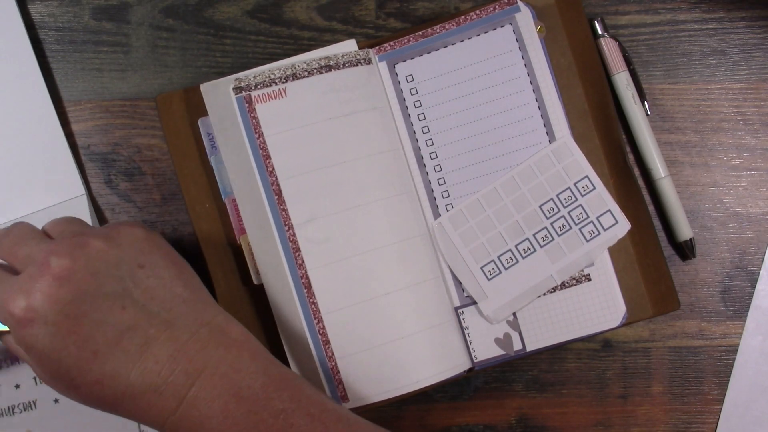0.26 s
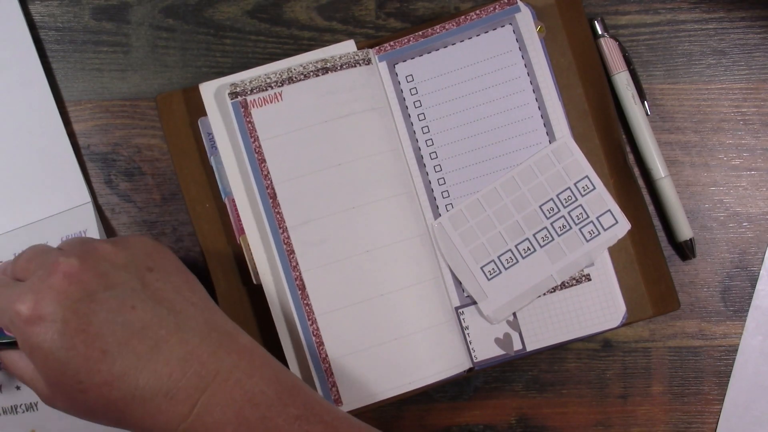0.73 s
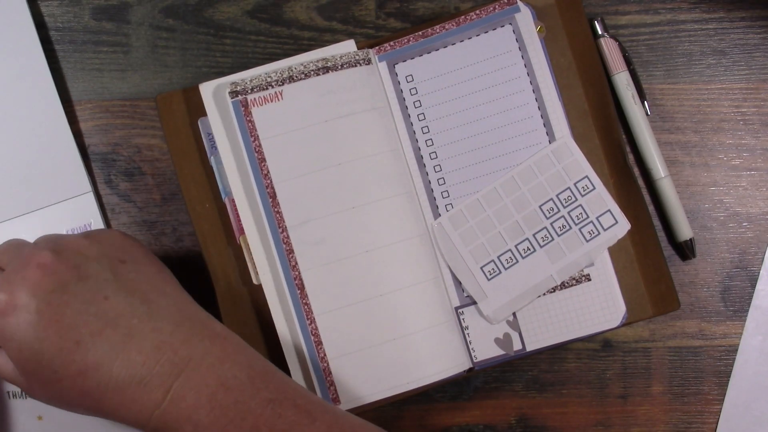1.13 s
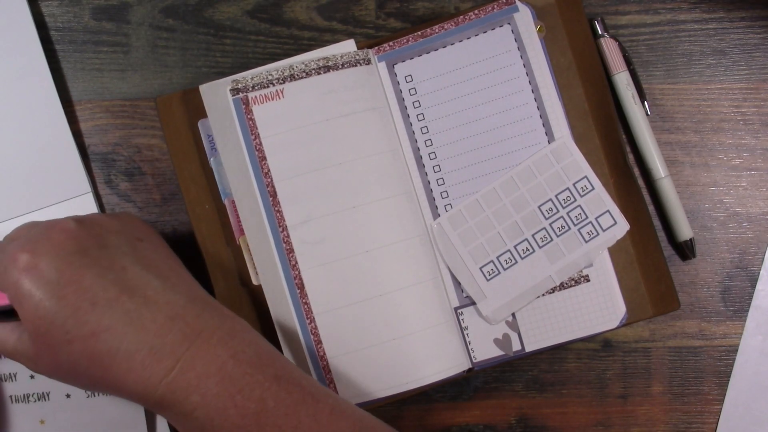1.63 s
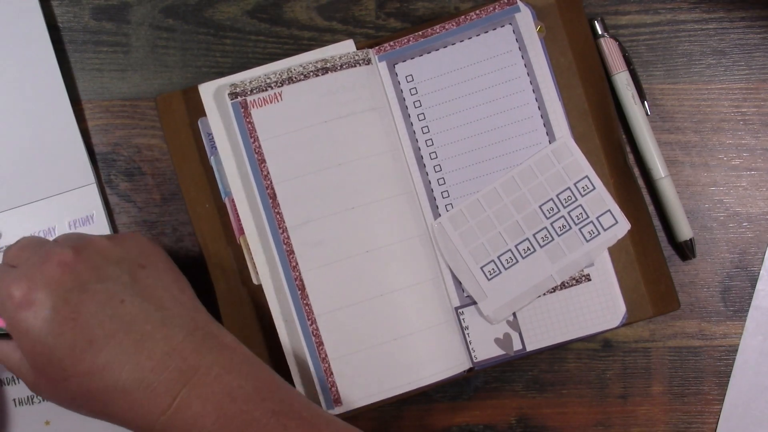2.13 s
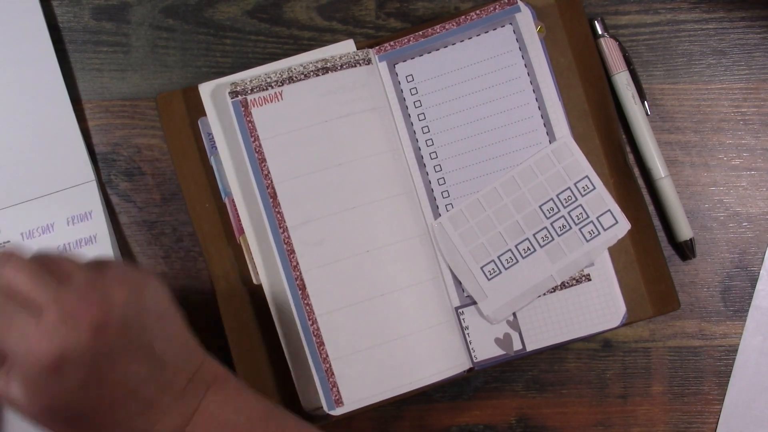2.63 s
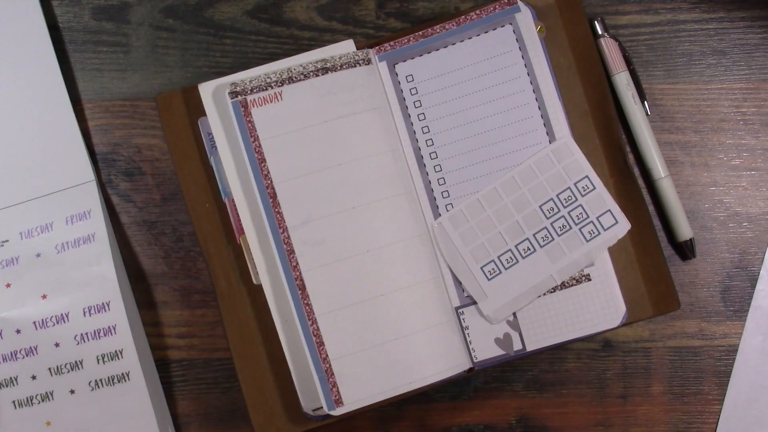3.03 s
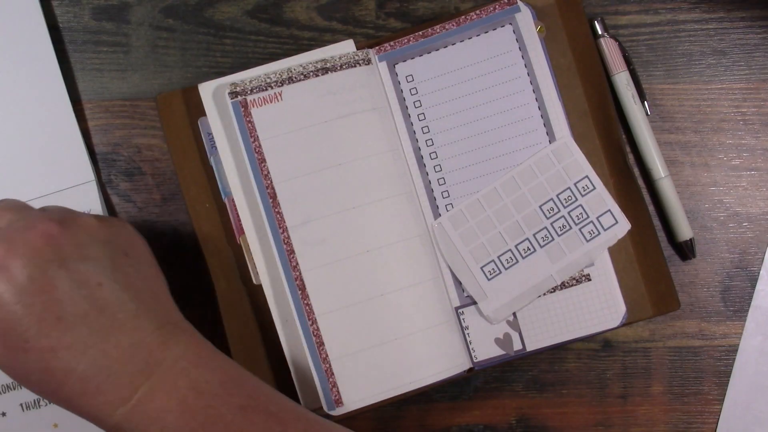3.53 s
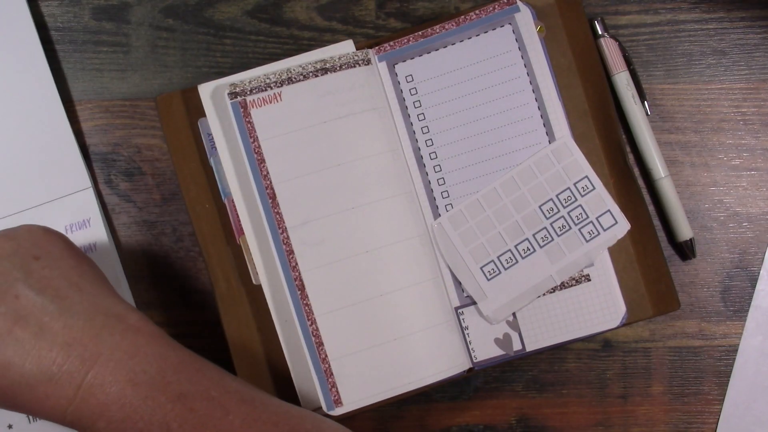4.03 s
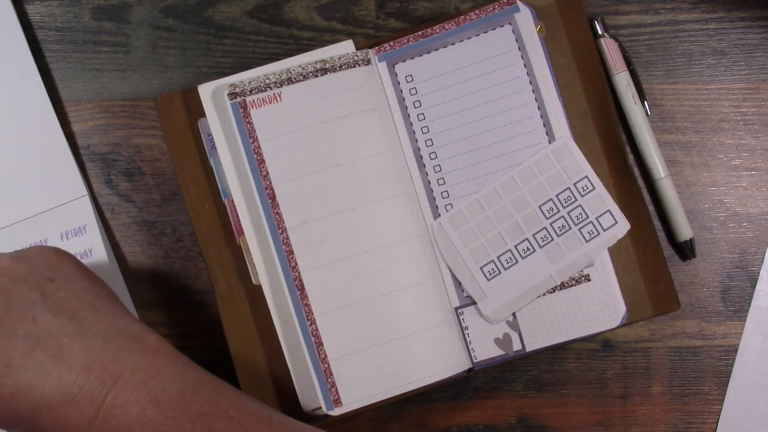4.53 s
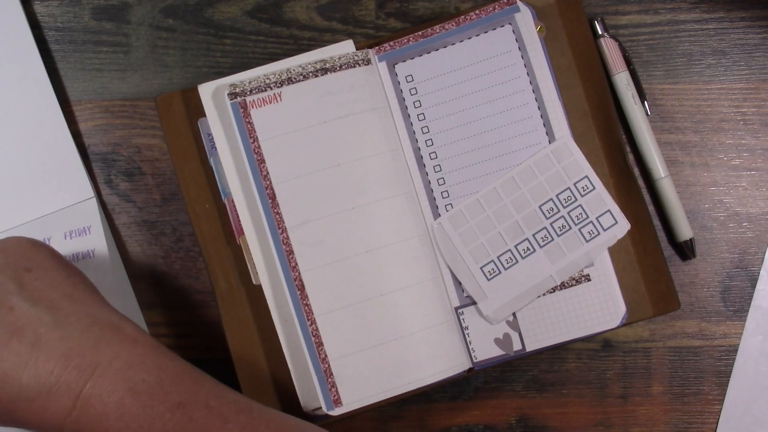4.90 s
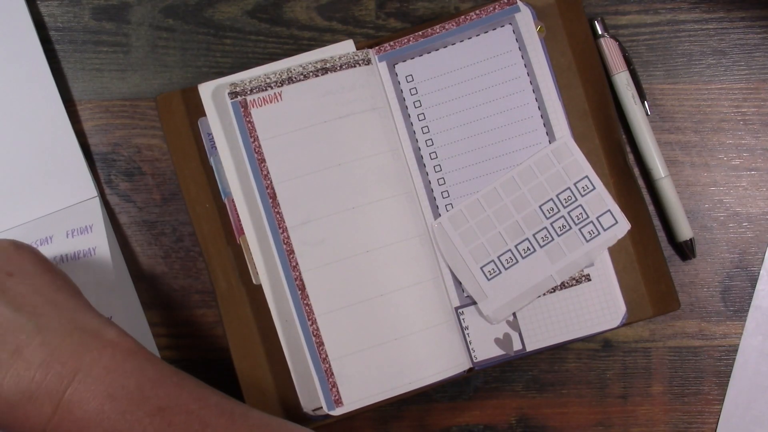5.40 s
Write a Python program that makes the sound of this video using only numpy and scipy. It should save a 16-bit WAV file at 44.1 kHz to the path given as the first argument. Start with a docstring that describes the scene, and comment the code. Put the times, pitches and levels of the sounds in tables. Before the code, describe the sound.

Stiff paper sticker sheets snap and pop loudly as they are peeled, then soft gritty rustling and faint taps in a quiet room.

```python
"""In a small quiet room, a hand peels paper sticker sheets beside a notebook on a wooden desk.
The stiff sheets snap as they buckle and the glue lets go: damped swings plus short noise bursts.
A brief flutter follows each snap; fingers and paper slide in strokes of gritty friction noise, and edges rasp.
The impulse response of desk and walls colours the paper; steady ventilation noise lies underneath."""
import sys
import numpy as np
from scipy import signal
from scipy.fft import rfft, irfft
from scipy.io import wavfile
from scipy.ndimage import uniform_filter1d

SR = 44100
rng = np.random.default_rng(int(sys.argv[2]) if len(sys.argv) > 2 else 0)


def to_wav(sig):
    """Store sig (one row per channel, or 1-D mono) as 16-bit WAV at the path in sys.argv[1].

    Samples outside -1..1 are clipped; the rate is SR.
    """
    pcm = np.clip(np.atleast_2d(sig), -1, 1) * 32767
    pcm = np.round(pcm).astype(np.int16)
    wavfile.write(sys.argv[1], SR, pcm.T)  # frames by channels


N = 249606

# Steady ventilation noise. Each row: frequency in Hz, relative level in dB per Hz.
AIR_SPECTRUM = [(12, -43), (20, -8), (65, -14.5), (268, 2), (443, 0.5), (843, -3.5), (1080, -10),
                (1350, -6.5), (1600, -6), (2240, -14.5), (2650, -13), (5620, -22.5), (6840, -23),
                (11300, -29), (15800, -38)]
AIR_DB = -53.5
# Likeness of the air noise at the two ports. Each row: frequency in Hz, correlation from 0 to 1.
AIR_LIKENESS = [(60, 0.99), (180, 0.77), (550, 0.88), (1650, 0.53), (4970, 0.76), (15000, 0.98)]

# Sliding paper or fingers. Each row: start in seconds, length in seconds, body of the rustle in dB,
# hiss in dB, hiss brightness in dB per octave.
STROKES = [(0.058, 0.15, -50.5, -59.5, -6.5), (0.14, .24, -56.5, -53, -5), (0.335, 0.17, -63, -61.5, -4),
           (0.481, 0.11, -60.5, -55.5, -3.5), (0.558, 0.11, -64, -58, -4), (0.796, 0.24, -56, -54.5, -8.5),
           (0.96, .1, -53, -62, -28), (1.276, 0.33, -53.5, -69, -9), (1.88, 0.23, -70, -64, -4.5),
           (2.073, 0.22, -63.5, -69, -2), (2.325, 0.2, -61, -59, -11), (2.578, 0.25, -90, -66.5, -2.5),
           (2.965, 0.21, -94, -66.5, -4), (3.191, 0.48, -61.5, -57, -4), (3.687, 0.31, -63.5, -61, -8),
           (3.911, 0.18, -61.5, -54.5, -8.5), (4.121, 0.14, -67, -60, -11),
           (4.256, 0.27, -64.5, -62.5, -7.5), (4.485, 0.55, -73, -74, -2), (4.979, 0.18, -61, -70.5, -17),
           (5.121, 0.16, -57.5, -62.5, -21), (5.291, 0.14, -60, -59.5, -20), (5.487, 0.11, -57.5, -61, -10),
           (5.578, 0.068, -46, -59.5, -3)]
STROKE_RISE, STROKE_FALL = 0.29, 0.47  # shares of the length
# Body spectrum of the rustle. Each row: frequency in Hz, relative level in dB per Hz.
RUSTLE_BODY = [(250, -37), (600, 7), (1200, 9), (1900, 7.5), (2600, -14), (4000, -39.5)]
STUTTER_DB, STUTTER_FRAMES = 1.5, 16  # the grip catches and lets go; one frame is 64 samples
FIBRE_RATE_HZ = 6000  # mean rate of fibre clicks

# Snaps of the sheet. Each row: start in seconds, flap of the sheet in dB, thud on the desk in dB,
# pop of the fold in dB, crack of the glue in dB, crack brightness in dB per octave.
SNAPS = [(0.236, -57, -55, -33.5, -47, -11), (0.562, -27, -23.5, -48, -43, -13),
         (0.57, -28.5, -44, -26.5, -57, -6), (0.593, -14, -19.5, -35, -64, -13),
         (0.747, -16, -18.5, -9.5, -46, -22), (0.823, -34, -29.5, -49, -50, -3),
         (0.957, -10, -10, -11, -34, -11), (1.087, -51, -52, -47, -54, -12),
         (1.121, -13.5, -28, 0.8, -25.5, -17.5), (1.291, -51, -56, -45, -60, -14),
         (1.307, -37, -58, -34, -70, -3), (1.383, -45, -58, -31, -46.5, -13),
         (1.494, -51, -57, -28.5, -48.5, -12.5), (1.759, -24.5, -29, -18, -26.5, -6),
         (2.09, -50, -62, -33, -56, -4), (2.125, -46, -56, -32.5, -66, -1),
         (2.247, -53, -53, -37, -51.5, -1), (2.334, -59, -63, -31, -44, -3.5),
         (2.356, -51, -54, -19.5, -36.5, -5.5), (2.373, -29, -66, -19, -37.5, -4),
         (2.388, -38, -57, -44, -47, -5), (2.404, -37, -60, -25, -31, -3),
         (2.425, -56, -52, -36, -37.5, -6), (2.436, -50, -60, -48, -38, 0.5),
         (2.479, -43, -47, -26, -38.5, -1), (2.484, -28, -45, -33, -37, -10),
         (2.659, -48, -58, -34, -55, -14), (3.036, -62, -62, -66, -43, 5),
         (3.315, -31.5, -34, -54, -48, 11), (3.505, -43, -32.5, -44, -53, -14),
         (3.546, -49, -44, -31, -50, -14), (4.304, -52, -35.5, -37, -41, -14),
         (4.325, -54, -33, -42, -45, -12.5), (4.991, -46, -55, -40, -60, -12),
         (5.333, -33, -36.5, -51, -51, -8), (5.513, -62, -58, -39, -46, 5),
         (5.531, -35.5, -50, -31, -46, -7), (5.551, -56, -48, -37, -45, -2),
         (5.597, -19.5, -53, -15, -29.5, -4)]
# Swings of flap, thud and pop, in that order. Each row: nominal frequency in Hz, width in cycles,
# start after the onset in seconds.
SWINGS = [(740, .75, 0), (350, .8, 0), (1550, .95, .0005)]
CRACK_S = 0.003  # the crack's envelope has halved by here
# Flutter after a snap: its body follows flap and pop, its hiss follows the crack.
FLUTTER_BODY_DB, FLUTTER_HISS_DB = -33, -19.5
FLUTTER_RISE_S, FLUTTER_T60_S = 0.0061, 0.28

# Rasps of a paper edge. Each row: start in seconds, length in seconds, centre in Hz, level before the fade in dB.
EDGE_RASPS = [(2.128, 0.078, 1900, -49), (2.466, .045, 2000, -41.5), (2.477, .022, 3460, -37.5)]

# Colour of the paper sounds at the microphone. Each row: frequency in Hz, gain in dB.
NEAR_COLOUR = [(40, -36), (120, -22.5), (330, -2), (2000, -4.5), (2600, -3.5), (9000, -1), (13000, -5.5),
               (15800, -16)]
# Ringing modes of desk and notebook. Each row: frequency in Hz, relative level in dB, T60 in seconds.
DESK_MODES = [(290, -6, .2), (395, 0, .2), (560, -6, .15), (684, 0, .16), (792, 0, .16), (885, -5, .16),
              (1005, -2, .14), (1178, -3, .15), (1252, -1, .15), (1315, -3, .15), (1383, -3, .15),
              (1435, -4, .16), (1650, 2, .16), (1895, 0, .17), (1992, -7, .15), (2160, -9, .12),
              (2430, -9, .1)]
DESK_DB = -4
# Reflections from near surfaces. Each row: delay in seconds, level before dulling in dB.
NEAR_ECHOES = [(.0012, -8), (.0016, -5), (.0042, -11), (.0084, -15)]
ECHO_DULL_HZ = 3260
# Diffuse tail of the walls. Each row: frequency in Hz, T60 in seconds, level in dB.
WALL_TAIL = [(250, .26, -11), (700, .2, -10), (1800, .19, -8), (3000, .15, -7), (6000, .13, -8),
             (12000, .1, -11)]
# Balance of the two ports. Each row: frequency in Hz, left minus right in dB.
PORT_BALANCE = [(60, -2.5), (240, 3.5), (950, 0.5), (3770, 0.5), (15000, -0.5)]
BAND_EDGE_HZ = 15900


def gain_of(db):
    """Amplitude ratio: 20 dB is a factor of ten."""
    return 10 ** (np.asarray(db) / 20)


def evened(x):
    """Normalisation to unit root-mean-square."""
    return x / np.sqrt(np.mean(x ** 2) + 1e-20)


def read(points, hz):
    """Interpolation of a curve along logarithmic frequency."""
    f, value = np.transpose(points)
    return np.interp(np.log(hz + 1), np.log(f + 1), value)


def add(mix, s, sound):
    """Superposition: a sound is summed into the mix from s seconds on."""
    part = mix[round(s * SR):][:len(sound)]
    part += sound[:len(part)]


def tilt(hz, slope_db):
    """Treble spectrum: rolled off below about 2 kHz, sloping by so many dB an octave above 2.6 kHz."""
    slope = gain_of(slope_db * np.log2(np.maximum(hz, 2600) / 6000))
    return slope / (1 + (2200 / (hz + 1)) ** 4)


def air():
    """Stationary random noise: partly correlated at the two ports, with faint drifting patches."""
    frames, hz = N // 256 + 5, np.fft.rfftfreq(1024, 1 / SR)
    a, b, c, d, patches = rng.standard_normal((frames, 513, 5)).T
    patches = uniform_filter1d(patches, 8, 0)  # along frequency
    patches = evened(uniform_filter1d(patches, 14, 1))  # along time
    same = np.clip(read(AIR_LIKENESS, hz), -1, 1)[:, None]
    left, other = a + 1j * b, c + 1j * d
    z = np.array([left, same * left + np.sqrt(1 - same ** 2) * other])
    z *= gain_of(read(AIR_SPECTRUM, hz)[:, None] + 1.4 * patches)
    noise = signal.istft(z, nperseg=1024, noverlap=768)[1][:, :N]
    return gain_of(AIR_DB) * evened(noise)


def rustles(t):
    """Friction rises and falls with each stroke; flutter after a snap decays exponentially.

    Yields envelope, body gain, hiss gain and hiss brightness in dB per octave."""
    for s, length, body_db, hiss_db, slope_db in STROKES:
        u = (t - s) / length
        ramp = np.clip(np.minimum(u / STROKE_RISE, (1 - u) / STROKE_FALL), 0, 1)
        arch = np.sin(np.pi / 2 * ramp) ** 2
        yield arch, gain_of(body_db), gain_of(hiss_db), slope_db
    for s, flap_db, _, pop_db, crack_db, slope_db in SNAPS:
        rise = np.clip((t - s) / FLUTTER_RISE_S, 0, 1)
        dying = rise * gain_of(-60 * np.maximum(t - s, 0) / FLUTTER_T60_S)
        body = np.hypot(*gain_of([flap_db, pop_db])) * gain_of(FLUTTER_BODY_DB)
        yield dying, body, gain_of(crack_db + FLUTTER_HISS_DB), slope_db


def slide():
    """Friction as random excitation: patchy noise made gritty by tiny fibre clicks of uneven size."""
    sizes = gain_of(3.2 * np.minimum(rng.exponential(1, N), 5))
    fibres = sizes * (rng.random(N) < FIBRE_RATE_HZ / SR) * rng.choice([-1., 1.], N)
    grit = evened(fibres) + 1.14 * rng.standard_normal(N)
    hz, t, z = signal.stft(grit, SR, nperseg=256, noverlap=192)
    patches = uniform_filter1d(rng.standard_normal(z.shape), 6, 0)  # along frequency
    patches = evened(uniform_filter1d(patches, 30, 1))  # along time
    body = evened(gain_of(read(RUSTLE_BODY, hz)))
    power = 0
    for envelope, low, high, slope_db in rustles(t):
        spectrum = low * body + high * evened(tilt(hz, slope_db))
        power = power + np.outer(spectrum ** 2, envelope ** 2)  # independent noises add in power
    stutter = evened(uniform_filter1d(rng.standard_normal(len(t)), STUTTER_FRAMES))
    shape = np.sqrt(power) * gain_of(1.5 * patches + STUTTER_DB * stutter)
    return signal.istft(z * shape, SR, nperseg=256, noverlap=192)[1][:N]


def swing(hz, cycles):
    """Heavily damped oscillation: the sheet pulls back, pushes and recoils."""
    u = np.linspace(-1.3, 1.3, round(2.6 * cycles * SR / hz)) * cycles  # time in periods
    swell = 1 / np.cosh(u / (0.43 * cycles)) - 1 / np.cosh(u[0] / (0.18 * cycles))
    return np.cos(2 * np.pi * u + 0.2) * swell


def snaps():
    """Buckling releases damped swings (flap, thud, sharper pop); tearing glue adds a short noise burst."""
    out, t, hz = np.zeros(N), np.arange(1024) / SR, np.fft.rfftfreq(1024, 1 / SR)
    grit = rng.standard_normal((len(SNAPS), 1024))
    detune = rng.uniform(0.79, 1.128, (len(SNAPS), 3))
    crack_envelope = np.minimum(t / 0.00011, 1) / (1 + (t / CRACK_S) ** 4)
    for (s, *swing_db, crack_db, slope_db), noise, factors in zip(SNAPS, grit, detune):
        for db, (f, cycles, late), factor in zip(swing_db, SWINGS, factors):
            add(out, s + late, gain_of(db) * swing(f * factor, cycles))
        burst = evened(irfft(rfft(noise) * tilt(hz, slope_db))) * crack_envelope
        add(out, s + 0.00037, gain_of(crack_db) * burst)
    return out


def rasps():
    """Band-limited friction: noise in a narrow band starts sharply and fades."""
    out = np.zeros(N)
    for (s, length, hz, db), noise in zip(EDGE_RASPS, rng.standard_normal((len(EDGE_RASPS), 8000))):
        band_filter = signal.butter(2, [hz - 200, hz + 200], "band", fs=SR, output="sos")
        band = evened(signal.sosfilt(band_filter, noise))
        size = min(round(length * SR), 8000)
        fade = signal.windows.tukey(size, .2) * np.linspace(1, .3, size)
        add(out, s, gain_of(db) * band[-size:] * fade)
    return out


def room():
    """Impulse response per port: direct sound, dull near echoes, modal desk ringing and diffuse decay."""
    size, spacing = SR // 2, 20  # samples
    t, taps, near = np.arange(size) / SR, np.zeros((2, size)), np.zeros(size)
    jitter = rng.integers(0, spacing, (2, (size - 201) // spacing))
    at = np.arange(200, size - spacing, spacing) + jitter
    np.put_along_axis(taps, at, rng.choice([-1., 1.], at.shape), 1)
    # the ports face apart, so sound from the side walls is partly opposed
    taps[1] = -.2 * taps[0] + .98 * taps[1]
    hz, frame_s, z = signal.stft(taps, SR, nperseg=256)
    f, t60, db = np.transpose(WALL_TAIL)
    fall = gain_of(-60 * frame_s / read([*zip(f, t60)], hz)[:, None])
    energy = 64 / spacing * 2 * (fall ** 2).sum(1, keepdims=True)  # taps per 128-sample hop
    fall *= gain_of(read([*zip(f, db)], hz))[:, None] / np.sqrt(energy)
    tail = signal.istft(z * fall, SR, nperseg=256)[1][:, :size]
    # each mode reaches the ports a little out of step
    phases = np.outer(rng.standard_normal(len(DESK_MODES)), [.4, -.4])[..., None]
    ring = 0
    for (f, db, t60), phase in zip(DESK_MODES, phases):
        ring = ring + gain_of(db - 60 * t / t60) * np.cos(2 * np.pi * f * t + phase)
    ring *= np.minimum(t / 0.0012, 1)
    for s, db in NEAR_ECHOES:
        near[round(s * SR)] = gain_of(db)
    echoes = signal.lfilter(*signal.butter(1, ECHO_DULL_HZ, fs=SR), near)
    out = tail + echoes + gain_of(DESK_DB) * ring / np.sqrt(SR)
    out[:, 0] += 1  # direct sound
    return out


def scene():
    """Linear superposition: paper sounds convolved with the room response, plus the air noise."""
    paper = snaps() + slide() + rasps()
    colour = gain_of(read(NEAR_COLOUR, np.fft.rfftfreq(N, 1 / SR)))
    paper = irfft(rfft(paper) * colour, N)
    return signal.oaconvolve(paper[None], room(), axes=1)[:, :N] + air()


def record(dry):
    """Linear filtering: a level balance between the ports at each frequency, then a low-pass band limit."""
    lean = gain_of(np.outer([.5, -.5], read(PORT_BALANCE, np.fft.rfftfreq(N, 1 / SR))))
    heard = irfft(rfft(dry) * lean, N)
    low_pass = signal.firwin(511, BAND_EDGE_HZ, window=("kaiser", 9), fs=SR)
    return signal.oaconvolve(heard, low_pass[None], "same")


dry = scene()
out = record(dry)
to_wav(out)
```